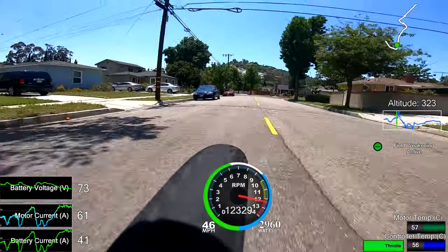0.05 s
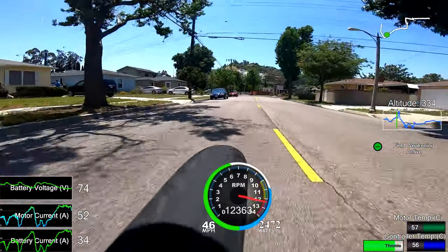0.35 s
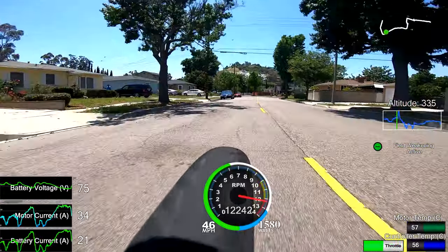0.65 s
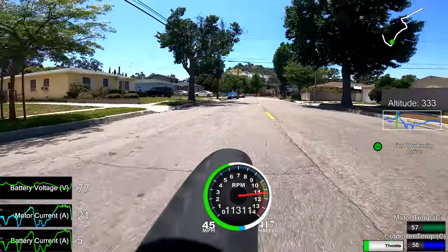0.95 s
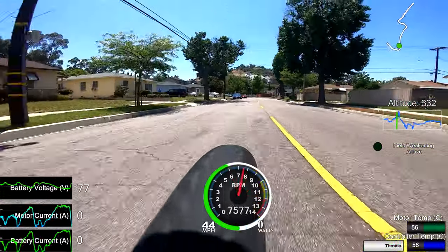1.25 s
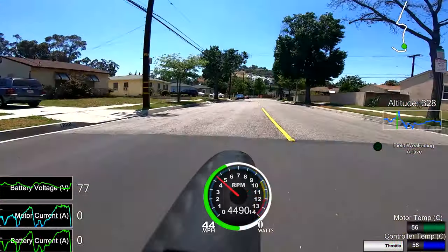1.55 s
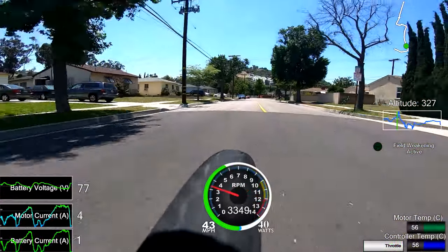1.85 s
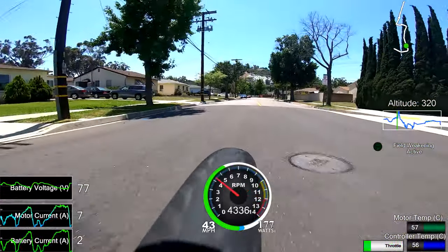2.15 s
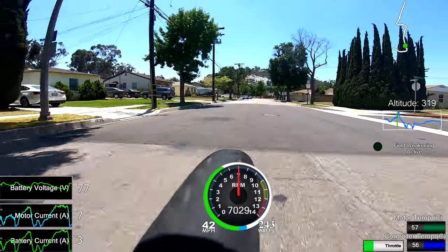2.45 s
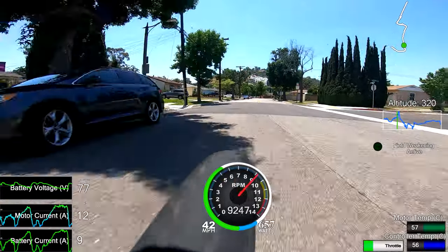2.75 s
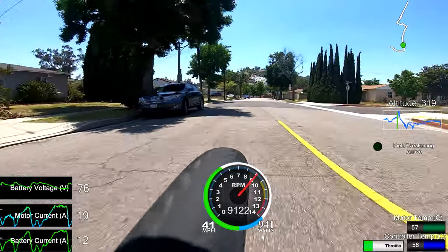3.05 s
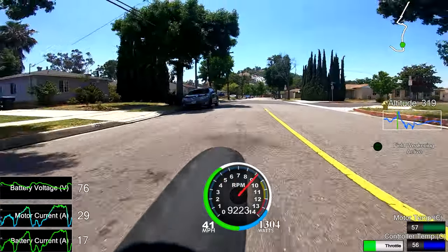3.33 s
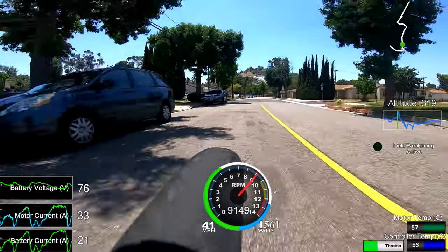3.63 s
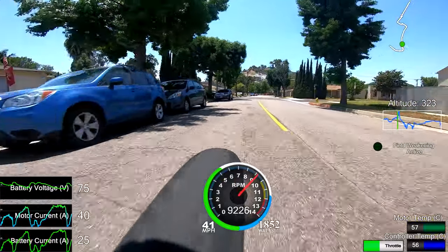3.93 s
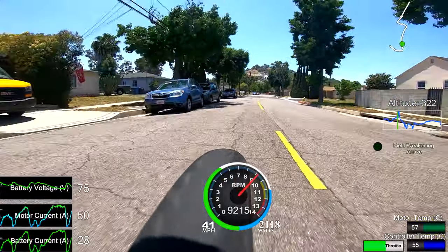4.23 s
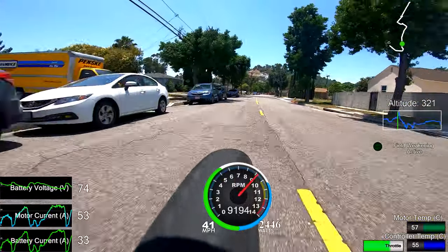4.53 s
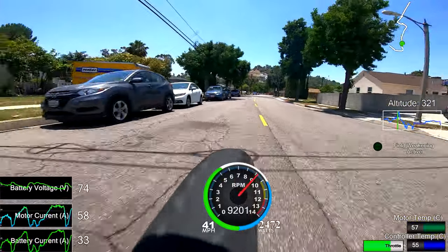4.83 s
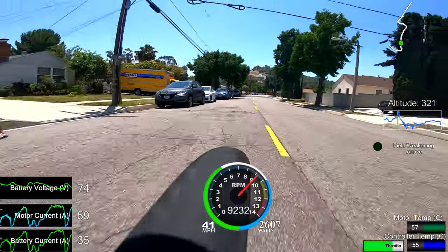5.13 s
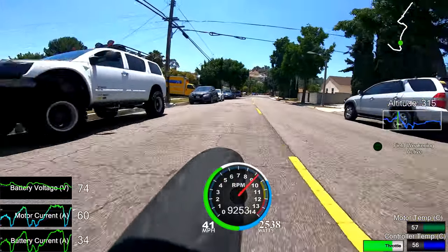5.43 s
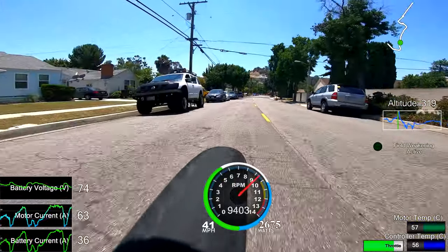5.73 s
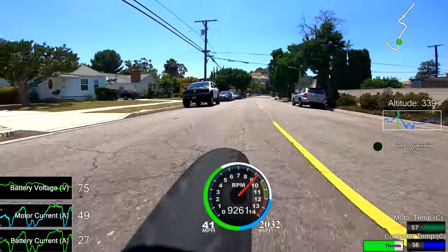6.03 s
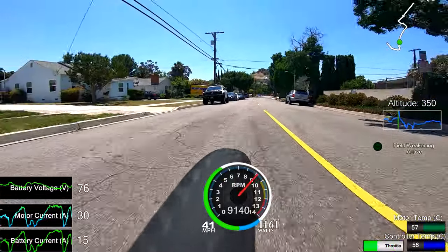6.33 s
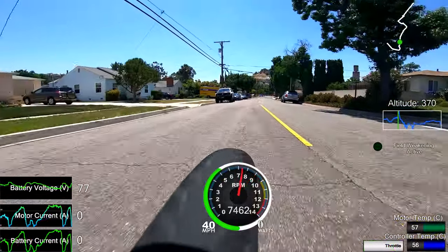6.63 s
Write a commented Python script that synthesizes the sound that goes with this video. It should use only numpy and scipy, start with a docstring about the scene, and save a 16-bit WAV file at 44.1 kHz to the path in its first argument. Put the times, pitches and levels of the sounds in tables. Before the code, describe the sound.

An electric bike motor whines through rumbling wind and chain hiss, drops in pitch as it coasts, then picks up again.

```python
"""On a street, a microphone rides along on a fast electric bike: full load, a coast, then load again.
The motor's teeth and poles whine at multiples of the shaft speed and waver once a wheel turn.
The chain's rollers rasp and hiss, its slack knocks on the guide, and small metal parts tick.
Wind lays a rumble under it all, breaking into flurries and short buffets.
Twice a falling whoosh passes: a rush of noise that swells and darkens."""
import sys
import numpy as np
from scipy import signal
from scipy.fft import rfft, irfft
from scipy.io import wavfile
from scipy.ndimage import uniform_filter1d, minimum_filter1d

SR = 44100
rng = np.random.default_rng(int(sys.argv[2]) if len(sys.argv) > 2 else 0)


def pcm_store(signal):
    """Save signal as 16-bit PCM."""
    levels = np.round(np.clip(np.atleast_2d(signal), -1, 1) * 32767)
    wavfile.write(sys.argv[1], SR, levels.astype(np.int16).T)


N = 303395

# Cue and envelope levels are relative: each layer adds its own trim. Spectra give tone colour only.
# motor shaft speed (t/s, f/Hz)
SHAFT_SPEED = [(0, 203.8), (.6, 203.3), (.85, 195.7), (1.1, 163), (1.5, 78.5), (1.8, 60), (2.1, 86),
               (2.3, 141.4), (2.4, 152), (2.7, 145.9), (3.6, 146.5), (4.4, 148.3), (5.3, 150.3),
               (5.8, 150.4), (6.25, 146.1), (6.5, 128), (6.88, 80)]
# wheel speed (t/s, f/Hz)
WHEEL_SPEED = [(0, 9.1), (1.2, 8.8), (2.5, 8.27), (5, 8.5), (6.9, 8.5)]
# pull of the motor (t/s, load/nominal full load)
MOTOR_LOAD = [(0, 1.4), (.35, 0.79), (.8, .36), (1.02, 0.017), (2.1, .02), (2.7, 0.19), (3.05, 0.39),
              (3.7, 0.51), (4.3, 0.59), (5.15, 1.09), (5.7, 0.69), (6.2, 0.49), (6.45, 0.094),
              (6.88, 0.011)]
# side lines of the mesh (f/shaft speed, level/dB against its overtone)
MESH_SIDE_LINES = [(13.1, 0.5), (27.4, -8), (29.4, -6), (32, -7), (68.5, -18.5), (80, -25)]
# ring of the motor casing (f/Hz, level/dB)
CASING_SPECTRUM = [(5600, -29), (5880, 5), (5990, 5), (6120, -7), (6400, -22)]
# high partials of the magnetic whine (f/shaft speed, level/dB)
WHINE_PARTIALS = [(48.5, -27), (75, -29), (102, -33)]
# chirps of the magnetic whine (t/s, level/dB)
WHINE_CHIRPS = [(2.34, -40.5), (2.46, -43), (2.55, -39), (2.66, -40), (2.78, -35), (2.91, -35.5),
                (3.03, -30.5), (3.14, -35), (3.271, -33.5), (3.41, -39), (3.52, -41), (3.621, -40),
                (3.73, -42), (3.83, -36)]
# envelope of the chain's rasp (t/s, level/dB)
RASP_ENVELOPE = [(0, -27), (.3, -34), (.88, -34.5), (1.08, -41), (1.43, -36.5), (1.53, -49.5), (2.1, -41),
                 (2.35, -38), (2.7, -44), (3.1, -35.5), (4.35, -33.5), (5.2, -29.5), (5.7, -32.5),
                 (6.88, -38.5)]
# midrange rasp of the rollers (f/Hz, level/dB)
RASP_SPECTRUM = [(400, 1), (620, 7), (900, 4), (1200, -4.5), (1520, 7.5), (1720, 5), (2050, 8), (2600, 7),
                 (3250, 4.5), (3750, 0), (4300, -7), (5500, -25), (9000, -30)]
# bright hiss of the rollers (f/Hz, level/dB)
HISS_SPECTRUM = [(2000, -15), (3300, 7), (4300, 4.5), (5300, 0), (6300, -5), (7100, -5.5), (8050, -4.5),
                 (9100, -12), (10200, -11.5), (11200, -13.5), (13000, -19), (15800, -20)]
# envelope of the wind's rumble (t/s, level/dB)
RUMBLE_ENVELOPE = [(0, -16.5), (1.55, -15.5), (1.66, -19.5), (2.25, -16), (2.6, -15.5), (3.4, -17),
                   (4.05, -16.5), (4.4, -20), (4.75, -19), (5.1, -17), (6.6, -16.5), (6.88, -19.5)]
# low end of the large eddies (f/Hz, level/dB)
RUMBLE_SPECTRUM = [(12, -19), (25, -6), (45, 4), (70, 0), (105, -0.5), (150, -9), (210, -16.5), (400, -33)]
# envelope of the small eddies (t/s, level/dB)
FLUTTER_ENVELOPE = [(0, -28), (.9, -29), (1.08, -35.5), (1.3, -27), (1.65, -31), (1.92, -27.5), (2.1, -33),
                    (2.42, -22), (2.78, -29), (3.2, -35), (3.8, -31), (4.5, -26.5), (5.25, -28.5),
                    (5.7, -30.5), (6.2, -29.5), (6.88, -27.5)]
# body of the small eddies (f/Hz, level/dB)
FLUTTER_SPECTRUM = [(70, -9), (130, 3), (200, 3.5), (290, -2.5), (450, -6.5), (700, -13.5), (950, -15.5),
                    (1200, -23), (1700, -32), (3000, -42), (6000, -72), (15000, -58)]
# their treble crackle (f/Hz, level/dB)
CRACKLE_SPECTRUM = [(1200, 3), (2300, 1), (3600, -7.5), (5500, -22), (12000, -30)]
# flurries of small eddies (t/s, length/s, level/dB)
FLURRY_CUES = [(0.004, 0.027, -20), (0.066, 0.054, -15), (0.114, 0.18, -18), (0.343, 0.033, -25),
               (0.41, 0.04, -31), (0.491, 0.036, -34), (0.605, 0.073, -19), (0.686, 0.033, -19.5),
               (0.723, 0.018, -28), (0.801, 0.035, -15.5), (0.902, 0.079, -20), (1.14, 0.056, -18),
               (1.307, 0.17, -14.5), (1.724, 0.065, -19.5), (1.911, 0.048, -19.5), (2.357, 0.34, -15.5),
               (2.73, 0.025, -38), (2.884, 0.066, -15.5), (3.303, 0.04, -19), (3.655, 0.027, -11),
               (3.754, 0.17, -15), (4.125, 0.064, -14), (4.62, 0.033, -19), (4.805, 0.028, -13.5),
               (4.902, 0.043, -21), (5.057, 0.04, -11.5), (5.115, 0.041, -15), (5.188, 0.033, -9),
               (5.256, 0.03, -14), (5.351, 0.038, -15.5), (5.488, 0.033, -14.5), (5.533, 0.028, -9),
               (5.877, 0.058, -19.5), (6.043, 0.022, -20), (6.112, 0.034, -24), (6.192, 0.033, -20),
               (6.32, 0.032, -18), (6.492, 0.045, -34), (6.61, 0.032, -20), (6.81, 0.061, -13)]
# wind buffets (t/s, thud level/dB, edge level/dB)
BUFFET_CUES = [(0.084, -9.5, -19.5), (0.17, -2, -26), (0.379, -7, -20), (0.556, -10, -20.5),
               (0.654, -13, -22.5), (0.906, -12, -21.5), (1.039, -9, -27.5), (1.134, -11, -27),
               (1.235, -28, -24), (1.348, -15, -23), (1.368, -31, -27), (1.445, -1, -13.5),
               (1.471, -2, -27), (1.706, -15, -28), (1.983, -12, -28), (2.164, -18, -29),
               (2.193, -7.5, -26), (2.31, -28, -25.5), (2.357, -22, -23), (2.672, -2, -40),
               (2.818, -18, -27.5), (3.306, -3.5, -28), (3.658, -5, -33), (3.749, -7, -34),
               (3.867, -5.5, -22.5), (4.151, -6, -29), (4.378, -5, -27), (4.908, -10.5, -25),
               (5.217, -21, -19.5), (5.259, -5, -27), (5.376, -9, -26), (5.882, -8, -24),
               (6.046, -7.5, -29), (6.127, -2.5, -30), (6.234, -11, -33), (6.465, -7.5, -22),
               (6.518, -7.5, -39), (6.835, -7.5, -22.5)]
# a buffet's thud and its edge (f/Hz, level/dB)
THUD_SPECTRUM = [(120, 8.0), (260, -6), (550, -13.0), (1100, -31.5)]
EDGE_SPECTRUM = [(350, -7.5), (750, 12.5), (1500, -3), (3200, -16)]
# chain knocks on the guide (t/s, level/dB)
KNOCK_CUES = [(0.379, -9.5), (0.6223, -9), (0.6534, -16), (0.7017, -14), (1.4344, -14.5), (2.9663, -15.5),
              (3.0385, -11.5), (3.1732, -16), (3.3404, -15), (4.6256, -12), (5.18, -13), (5.5544, -16),
              (5.9678, -13), (6.0382, -12.5), (6.2866, -15.5)]
# ring of the guide (f/Hz, level/dB)
GUIDE_SPECTRUM = [(1000, 1.5), (2200, -7), (2700, 7), (3250, 6), (4200, -5.5), (7000, -27), (15000, -27)]
# light metal ticks (t/s, level/dB)
TICK_CUES = [(0.419, -24), (0.637, -20.5), (0.807, -26), (0.827, -29), (0.8676, -27.5), (0.9624, -30.5),
             (3.0158, -28), (5.1277, -24), (5.5544, -29), (6.2168, -31), (6.286, -27), (6.6707, -29.5)]
# ring of the small metal parts (f/Hz, level/dB)
METAL_SPECTRUM = [(3500, -21), (5000, -3), (5600, 9.5), (6100, 3), (6600, 5.5), (7200, -0.5), (8200, -1.5),
                  (9200, -12), (15000, -23)]
# falling whooshes (t/s, length/s, level/dB, opening cutoff f/Hz, closing cutoff f/Hz)
WHOOSH_CUES = [(1.41, 0.21, -14, 1680, 694), (2.386, 0.25, -17, 1300, 600)]
# a whoosh before its filter sweep (f/Hz, level/dB)
WHOOSH_SPECTRUM = [(130, 12), (220, 5.5), (400, -2), (700, -6.5), (1100, -12), (2000, -14)]

CRUISE_HZ = 149  # shaft speed when cruising
MESH_DB, OVERTONE_DB, WHINE_DB, HISS_DB, CRACKLE_DB = -37, -40, -50.5, -36.5, -17.5  # layer trims
CHIRP_HALF_S, CHIRP_BEND = 0.0294, 0.0368
TIME = np.arange(N) / SR


def undb(db):
    """Decibels to gain."""
    return 10 ** (np.asarray(db) / 20)


def curve(table):
    """An automation lane: straight lines between breakpoints."""
    return np.interp(TIME, *np.transpose(table))


def walk(rate):
    """Smooth random motion of spread 1, up to about `rate` changes a second."""
    hz = np.arange(N // 2 + 1) * SR / N
    y = irfft(rfft(rng.standard_normal(N)) * np.exp(-.5 * (hz / rate) ** 2), N)
    return y / y.std()


def colour(x, spectrum):
    """EQ by a spectrum, rolling off past its ends; unit rms."""
    f, db = np.transpose(spectrum)
    hz = np.arange(len(x) // 2 + 1) * SR / len(x) + 1e-3
    skirts = np.minimum(hz / f[0], 1) ** 2 * np.minimum(f[-1] / hz, 1) ** 2
    y = irfft(rfft(x) * skirts * undb(np.interp(np.log(hz), np.log(f), db)), len(x))
    return y / y.std()


def add(out, s, x):
    """Mix x in from time s."""
    i = max(int(s * SR), 0)
    out[i:i + len(x)] += x[:max(N - i, 0)]


def motor_line(turns, order, rough, blur_hz):
    """A sine at `order` times the shaft speed, with a share smeared by uneven teeth."""
    smear = rough * (walk(blur_hz) + 1j * walk(blur_hz)) / np.sqrt(2)
    return np.sqrt(2 / (1 + rough ** 2)) * np.real((1 + smear) * np.exp(2j * np.pi * order * turns))


def tooth_mesh(turns, wheel_angle, speed, shaft, load):
    """Sprocket teeth sing louder under load and throb once a wheel turn, deepest at top speed."""
    throb_db = (2 + 3.5 * (speed / speed.max()) ** 4) * np.cos(wheel_angle)
    mesh = undb(MESH_DB + throb_db) * load ** 1.43 * motor_line(turns, order=14, rough=.73, blur_hz=60)
    sides = sum(undb(db) * motor_line(turns, order, rough=2.4, blur_hz=64.6)
                for order, db in MESH_SIDE_LINES)
    overtone = motor_line(turns, order=28, rough=.85, blur_hz=50)
    fade_db = -18 * np.maximum(np.log2(shaft / CRUISE_HZ), 0)  # duller above cruising speed
    return mesh + undb(OVERTONE_DB + fade_db) * load ** .9 * (overtone + sides)


def casing_ring(turns):
    """The casing rings while a motor line lies on its resonance."""
    return colour(motor_line(turns, order=40, rough=2.5, blur_hz=110), CASING_SPECTRUM)


def magnetic_whine(turns, speed, load):
    """The poles whine with load, and chirp upward as the rotor takes up the chain's slack."""
    ages = [(TIME - s) / CHIRP_HALF_S for s, _ in WHINE_CHIRPS]
    bend = CHIRP_BEND * sum(age * np.exp(-age ** 2 / 2) for age in ages)
    rotor_turns = np.cumsum(speed * (1 + bend)) / SR
    whine = motor_line(rotor_turns, order=22, rough=.85, blur_hz=75)
    partials = sum(undb(db) * motor_line(turns, order, rough=1.5, blur_hz=50)
                   for order, db in WHINE_PARTIALS)
    whine += np.clip(2.4 - 4 * load, 0, 1.2) * partials  # only under light load
    chirps = sum(undb(db) * np.exp(-age ** 2 / 2) for (_, db), age in zip(WHINE_CHIRPS, ages))
    return undb(1.4 * walk(40)) * (chirps + undb(WHINE_DB) * load) * whine


def motor(wheel_angle, shaft, load, hiss_db):
    """Mesh, casing and poles; the rear sprocket tightens the chain once a wheel turn, bending pitch."""
    speed = shaft * (1 + 0.003977 * walk(15.13))
    turns = np.cumsum(speed * (1 + 0.0119 * np.cos(wheel_angle))) / SR
    mesh = tooth_mesh(turns, wheel_angle, speed, shaft, load)
    ring = undb(hiss_db - 20) * casing_ring(turns)
    return mesh + ring + magnetic_whine(turns, speed, load)


def chain(wheel_angle, hiss_db):
    """Dense, uneven roller impacts blur into a mid rasp and a bright hiss."""
    contact = undb(1.5 * walk(400) + 1.05 * walk(18.6) + 0.054 * np.cos(wheel_angle))
    rasp = colour(rng.standard_normal(N) * contact * undb(0.86 * walk(73)), RASP_SPECTRUM)
    hiss = colour(rng.standard_normal(N) * contact, HISS_SPECTRUM)
    return rasp * undb(curve(RASP_ENVELOPE)) + hiss * undb(hiss_db)


def wind():
    """Large eddies rumble; small ones come in bursts, ride its pressure peaks and crowd into flurries."""
    eddies = colour(rng.standard_normal(N), RUMBLE_SPECTRUM)
    swell = np.sqrt(uniform_filter1d(eddies ** 2, size=2600) + 0.023)
    eddies /= swell ** 0.68  # compress to an even bed
    rumble = eddies * undb(curve(RUMBLE_ENVELOPE) + 1)
    burst_db = 10.66 * np.tanh(0.48 * walk(17.7) + 0.42 * walk(119))  # airspeed bounds a burst
    bursts = undb(burst_db) * (1 + 0.31 * np.tanh(.5 * eddies ** 2))
    flutter = colour(rng.standard_normal(N) * bursts, FLUTTER_SPECTRUM)
    crackle = undb(CRACKLE_DB) * colour(rng.standard_normal(N) * bursts, CRACKLE_SPECTRUM)
    flurries = sum(undb(db - 4.5) / (1 + (2 * (TIME - s) / length - 1) ** 4)
                   for s, length, db in FLURRY_CUES)
    turbulence = np.hypot(undb(curve(FLUTTER_ENVELOPE) + 2.96), flurries)
    return rumble + (flutter + crackle) * turbulence


def puff(spectrum, length_s):
    """A rounded burst of air pressure, as quick to end as to start; peak 1."""
    t = np.arange(4096) / SR
    envelope = np.sin(np.pi * np.minimum(t / length_s, 1)) ** 2
    y = colour(rng.standard_normal(len(t)), spectrum) * envelope
    return y / np.abs(y).max()


def buffets():
    """An eddy bursts on the microphone port: a low thud, then a steep pressure swing at its edge."""
    out = np.zeros(N)
    t = np.arange(700) / SR
    chance = rng.uniform(-1.1, 1, (len(BUFFET_CUES), 2))
    for (s, thud_db, edge_db), (polarity, size) in zip(BUFFET_CUES, chance):
        add(out, s - .003, undb(thud_db - 1) * puff(THUD_SPECTRUM, length_s=0.0188))
        add(out, s, undb(edge_db + 6.5) * puff(EDGE_SPECTRUM, length_s=0.009))
        age = (t - .004) / (0.00036 * 1.8 ** size)
        swing = np.sign(polarity) * age / (1 + age ** 2) ** 2
        add(out, s, undb(edge_db + 18) * swing)
    return out


def strike(spectrum, rise_s, decay_s):
    """A short burst of metal contacts, ringing through a spectrum; peak 1."""
    t = np.arange(4096) / SR
    envelope = (1 - np.exp(-t / rise_s)) ** 2 * np.exp(-t / decay_s)
    y = colour(rng.standard_normal(len(t)), spectrum) * envelope
    return y / np.abs(y).max()


def rattles():
    """The slack chain knocks on its guide and small metal parts tick."""
    out = np.zeros(N)
    for s, db in KNOCK_CUES:
        add(out, s, undb(db - 3.5) * strike(GUIDE_SPECTRUM, rise_s=0.00057, decay_s=0.0029))
    for s, db in TICK_CUES:
        add(out, s, undb(db) * strike(METAL_SPECTRUM, rise_s=0.0016, decay_s=0.0035))
    return out


def falling_whooshes():
    """A rush of noise swells and darkens as its cutoff falls."""
    out = np.zeros(N)
    for s, length, db, open_hz, closed_hz in WHOOSH_CUES:
        rush = colour(rng.standard_normal(N), WHOOSH_SPECTRUM)
        hz, frame_s, bands = signal.stft(rush, SR, nperseg=512)
        cutoff_hz = np.interp(frame_s, [s, s + length], [open_hz, closed_hz])
        swept = signal.istft(bands / (1 + (hz[:, None] / cutoff_hz) ** 12), SR)[1][:N]
        age = np.clip((TIME - s) / length, 0, 1)
        out += undb(db) * np.sin(np.pi * age) * swept
    return out


def scene():
    """Drive train, wind and whooshes in mono; shaft speed and load ride the motor and the chain's hiss."""
    wheel_angle = 2 * np.pi * (np.cumsum(curve(WHEEL_SPEED)) / SR - .22)
    shaft, load = curve(SHAFT_SPEED), curve(MOTOR_LOAD)
    # hiss power grows with load above an idling share, and by 3 dB per doubling of speed
    hiss_db = HISS_DB + 10 * np.log10(0.089 + load) + 3 * np.log2(shaft / CRUISE_HZ)
    drive = motor(wheel_angle, shaft, load, hiss_db) + chain(wheel_angle, hiss_db) + rattles()
    return (drive + wind() + buffets() + falling_whooshes())[None]


def record(dry):
    """The rider's camera limits the strongest wind peaks and cuts the top end."""
    ceiling, top_hz = 0.77, 15680
    needed_gain = np.minimum(1, ceiling / (np.abs(dry) + 1e-9))
    gain = uniform_filter1d(minimum_filter1d(needed_gain, size=300), size=300)
    high_cut = signal.ellip(10, .2, 80, top_hz, fs=SR, output="sos")
    return signal.sosfilt(high_cut, dry * gain)


dry = scene()
out = record(dry)
pcm_store(out)
```